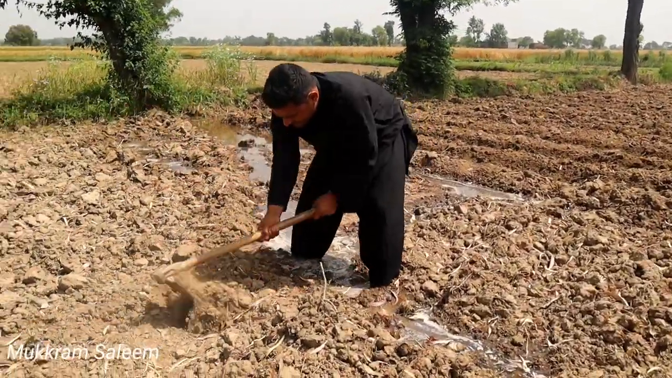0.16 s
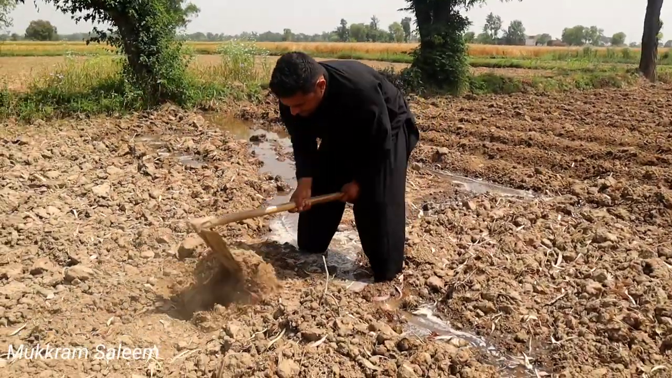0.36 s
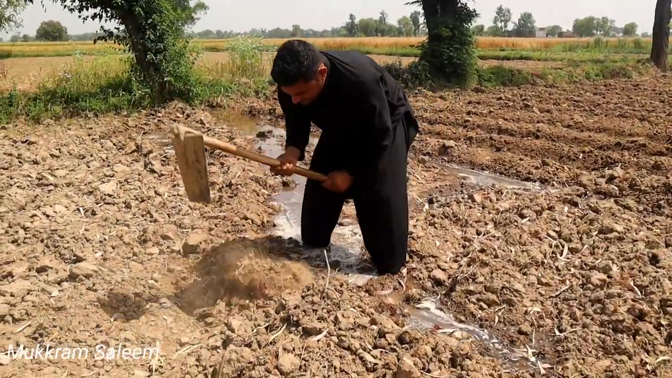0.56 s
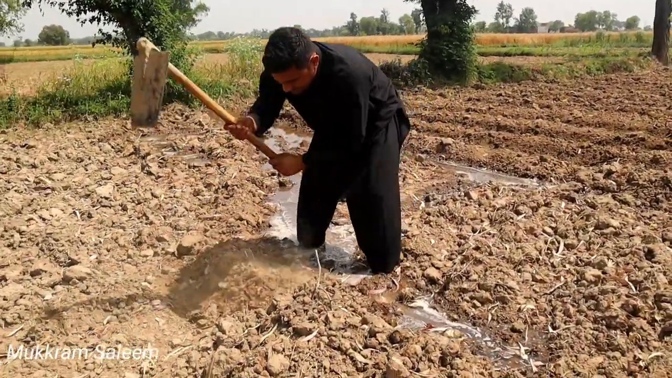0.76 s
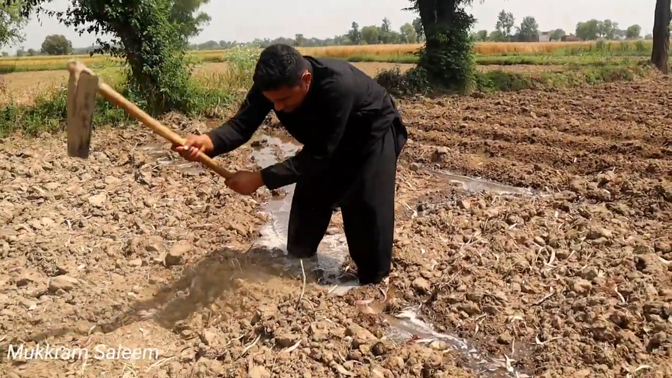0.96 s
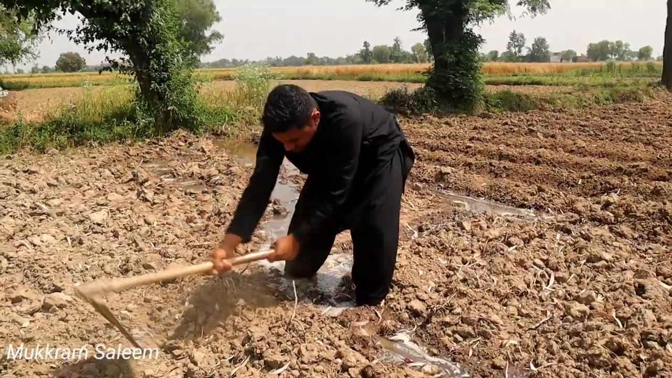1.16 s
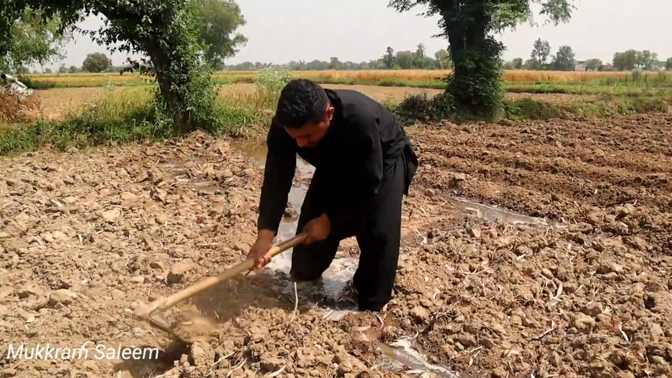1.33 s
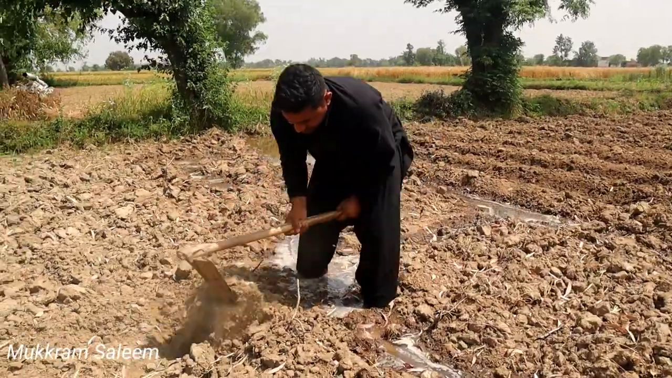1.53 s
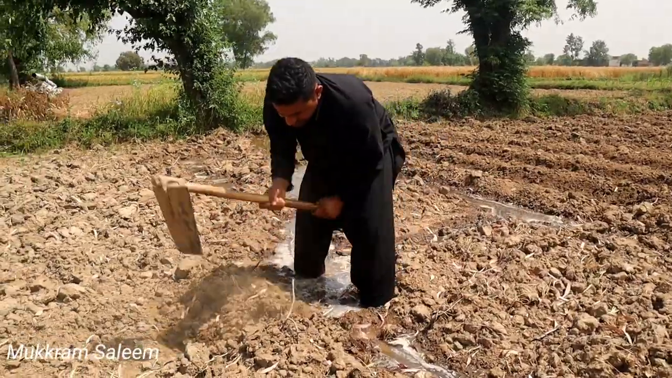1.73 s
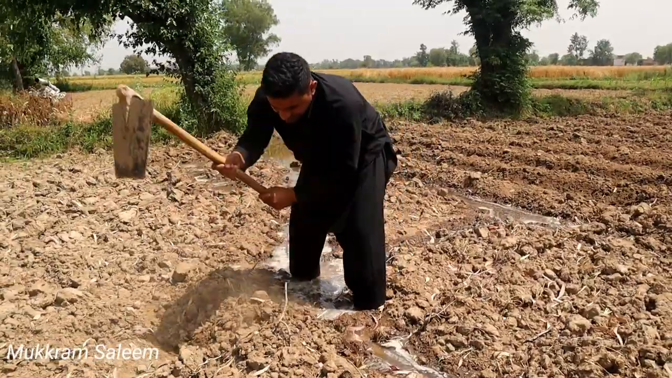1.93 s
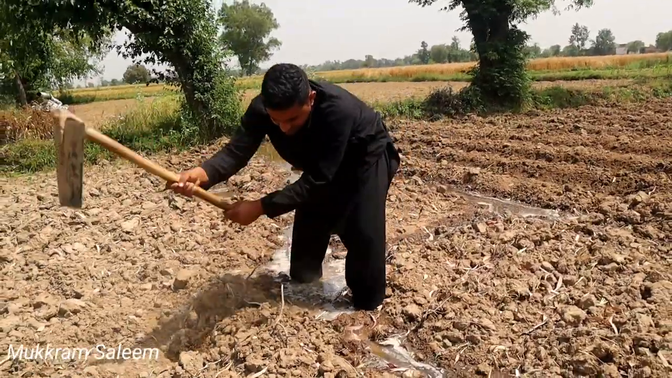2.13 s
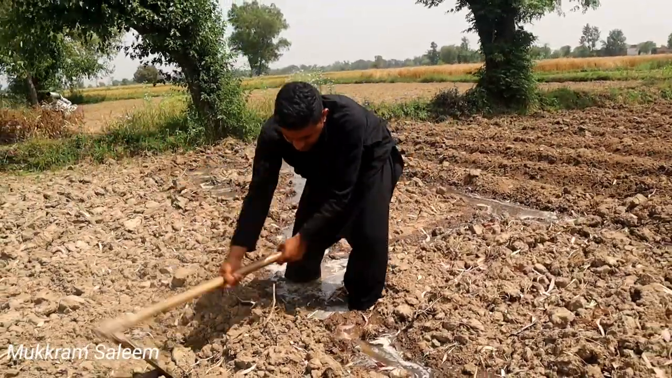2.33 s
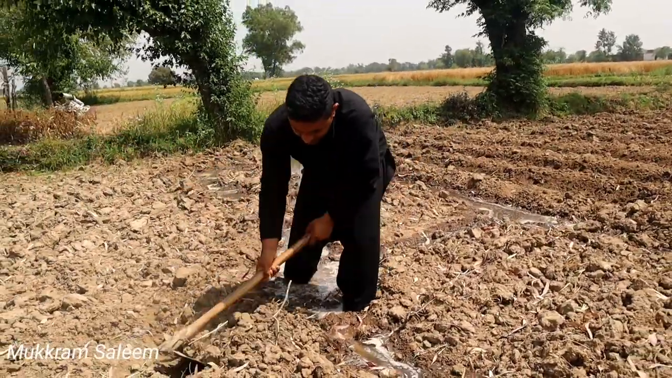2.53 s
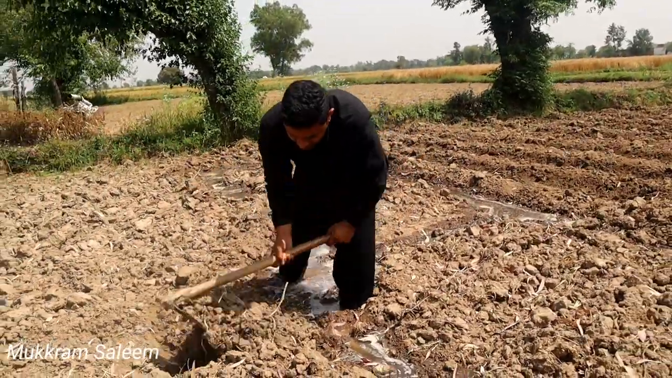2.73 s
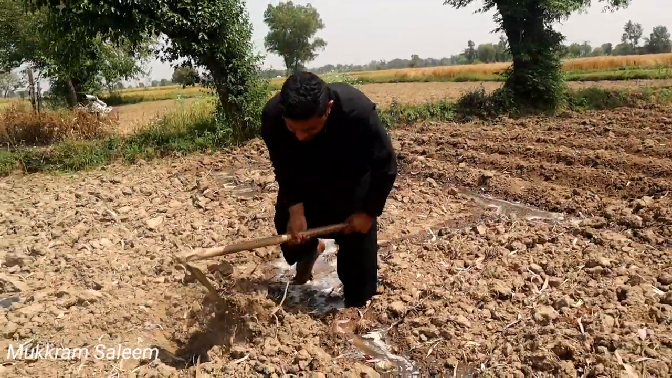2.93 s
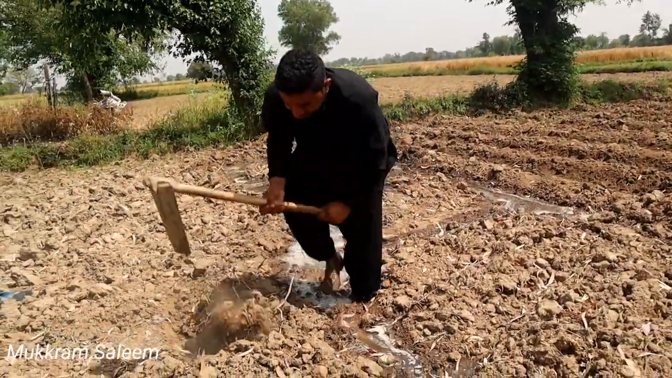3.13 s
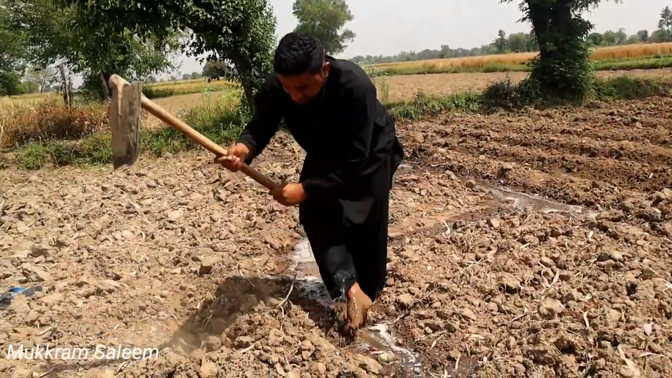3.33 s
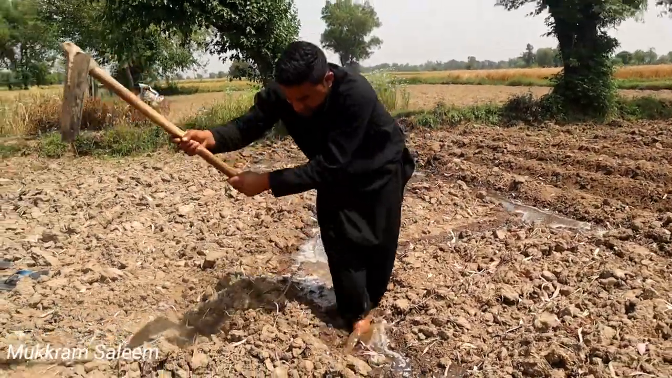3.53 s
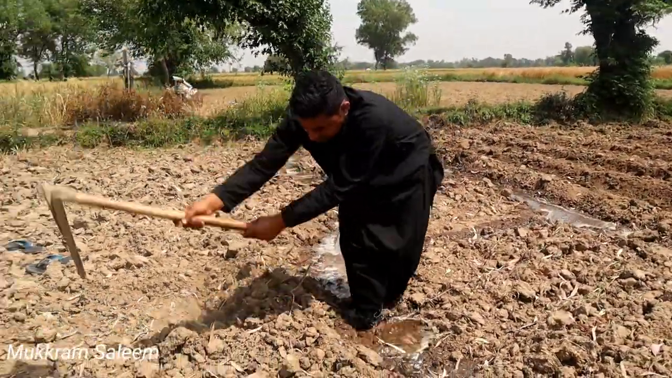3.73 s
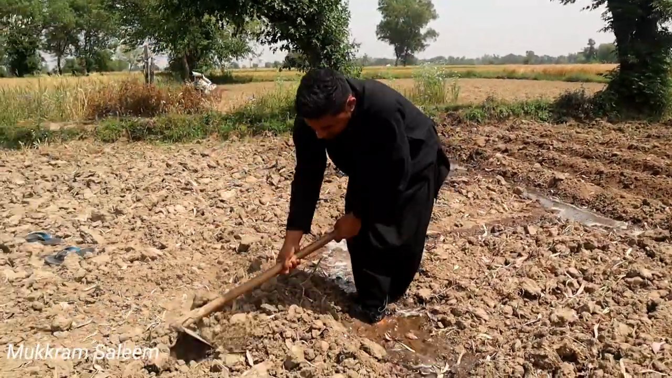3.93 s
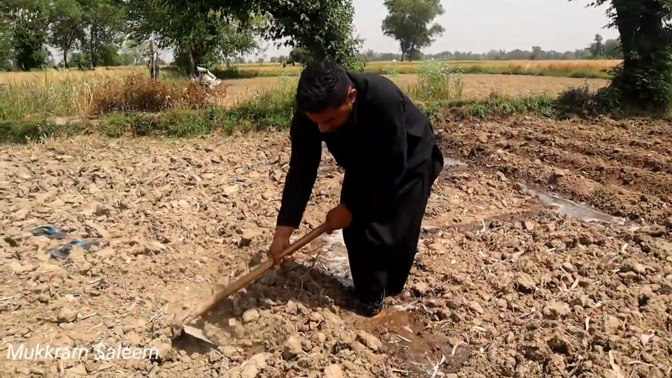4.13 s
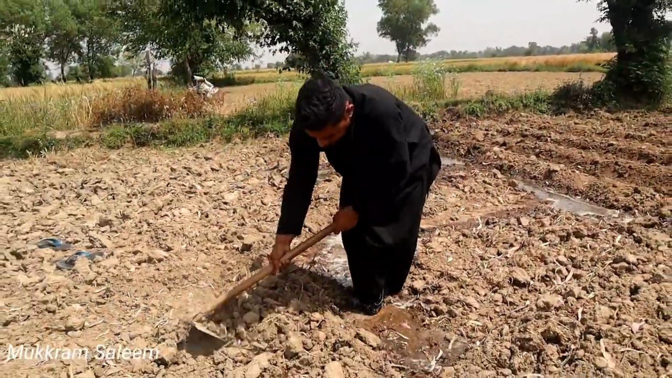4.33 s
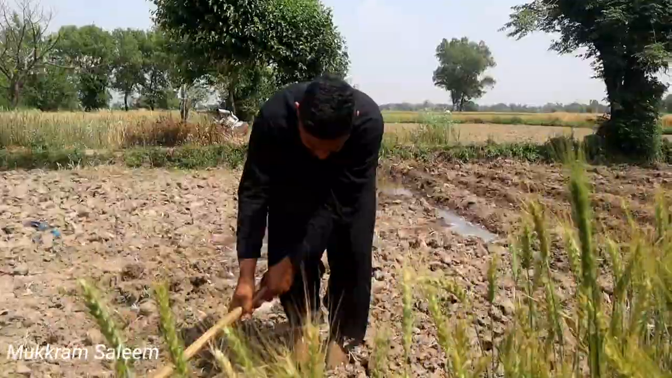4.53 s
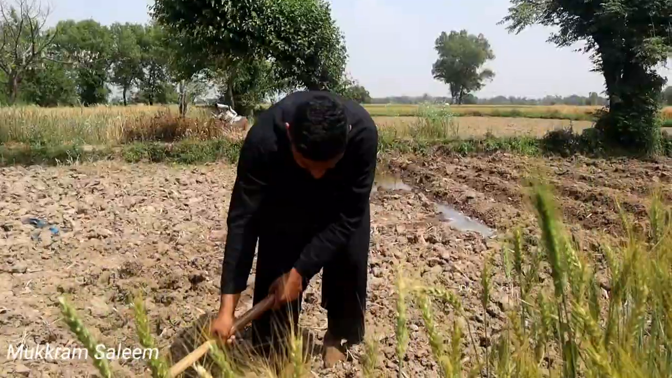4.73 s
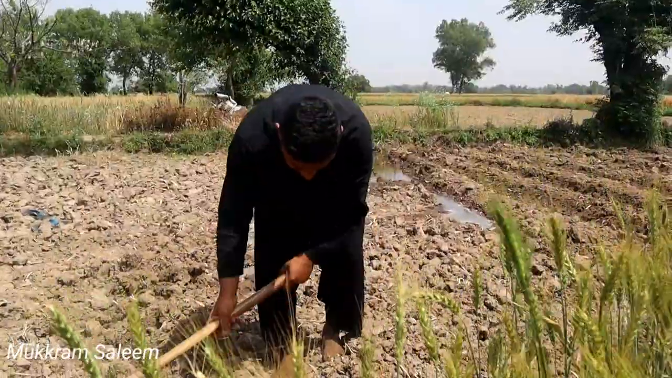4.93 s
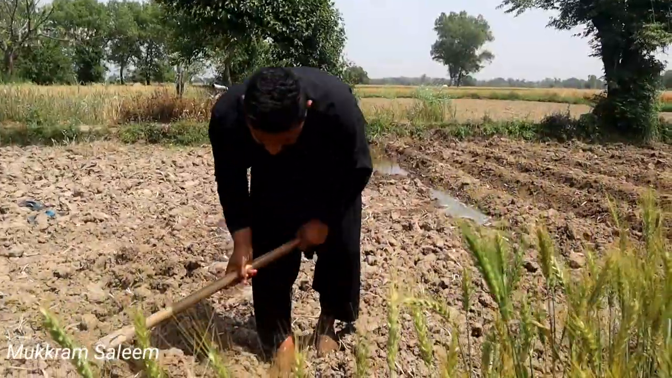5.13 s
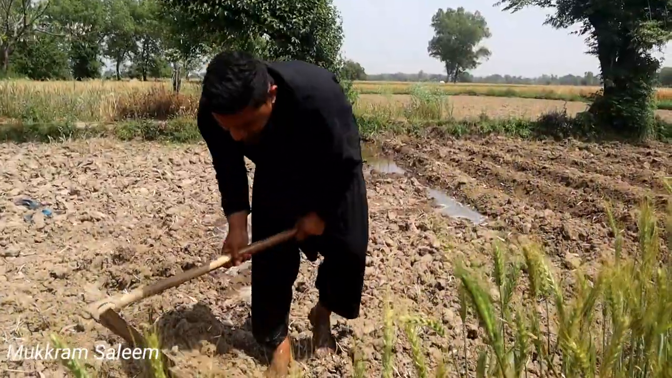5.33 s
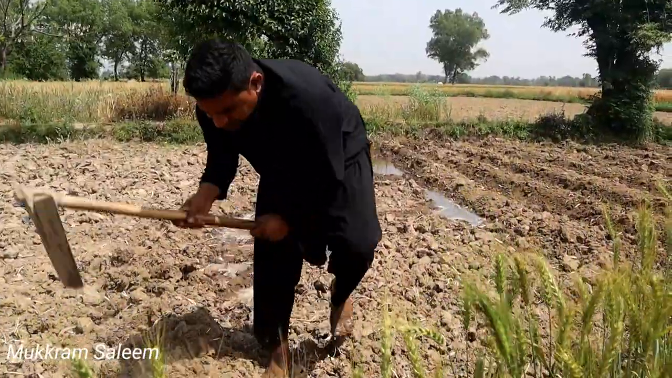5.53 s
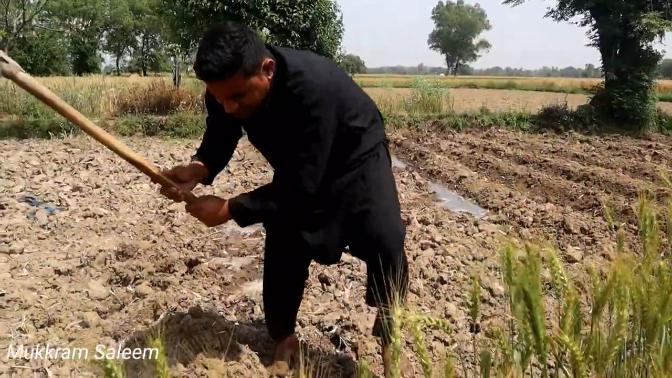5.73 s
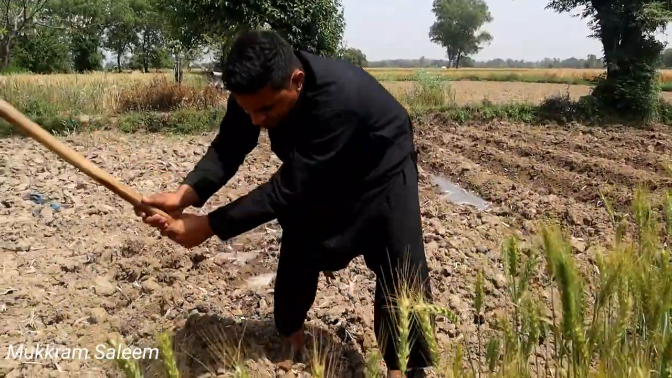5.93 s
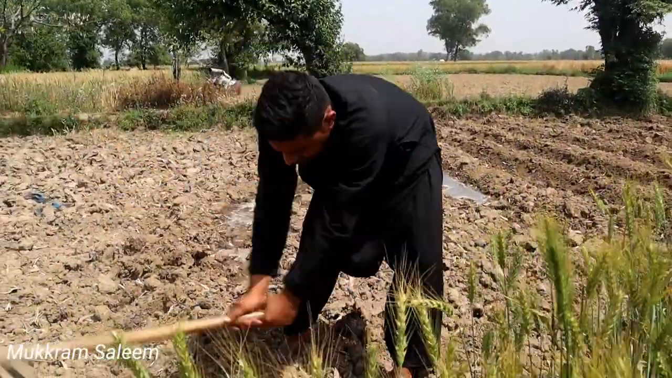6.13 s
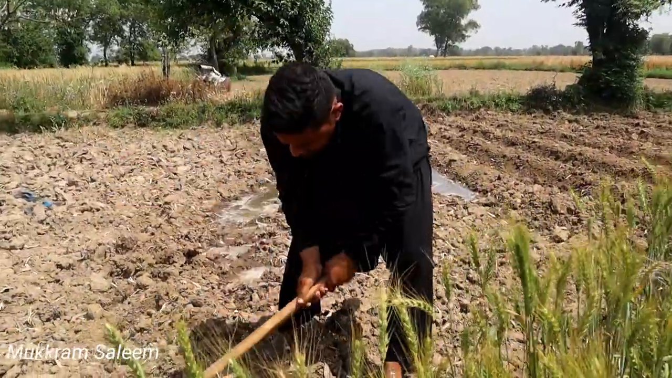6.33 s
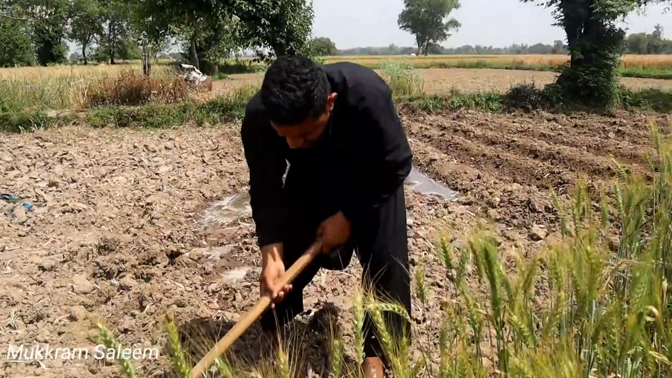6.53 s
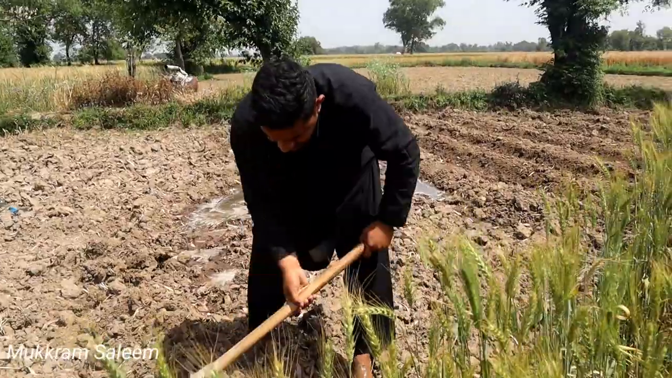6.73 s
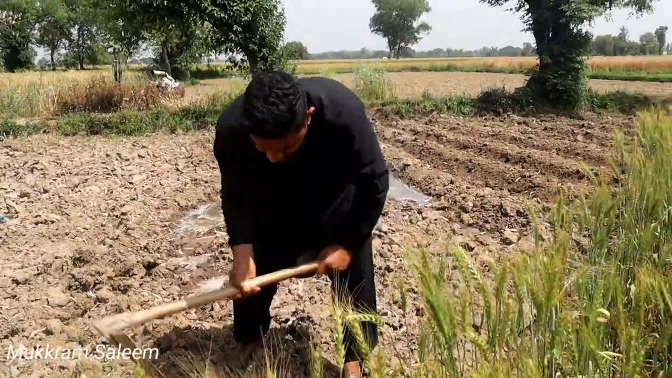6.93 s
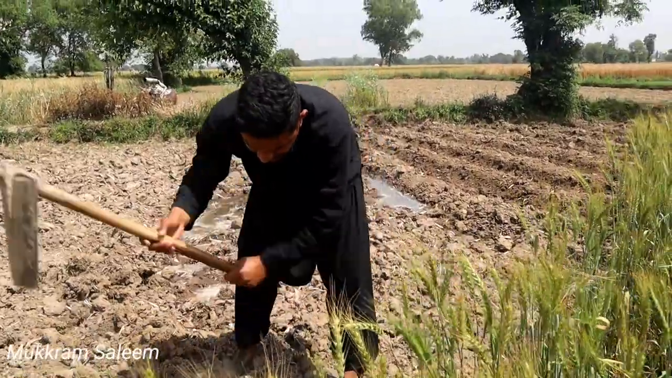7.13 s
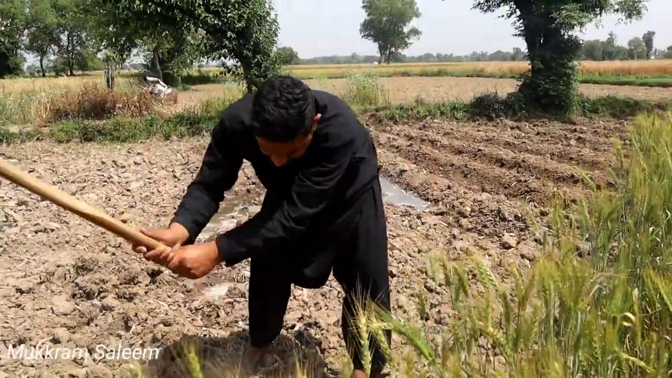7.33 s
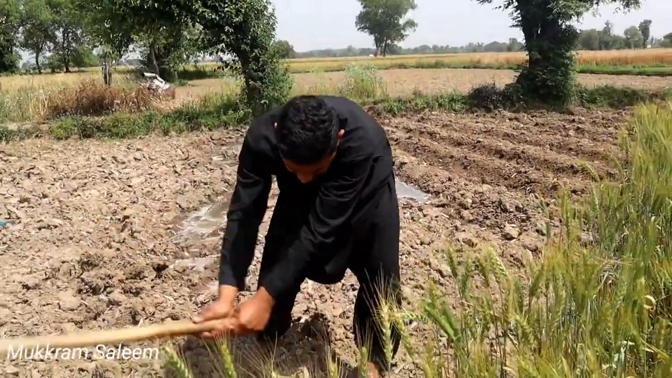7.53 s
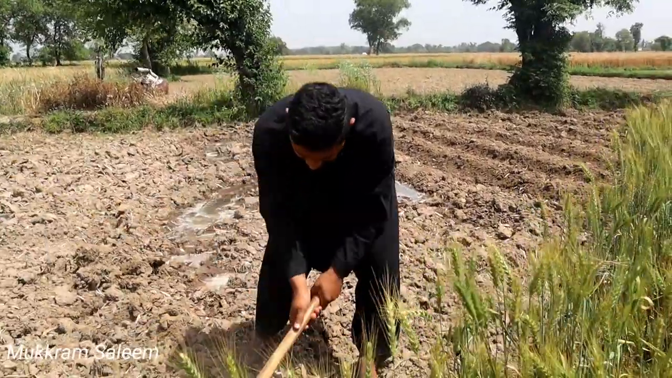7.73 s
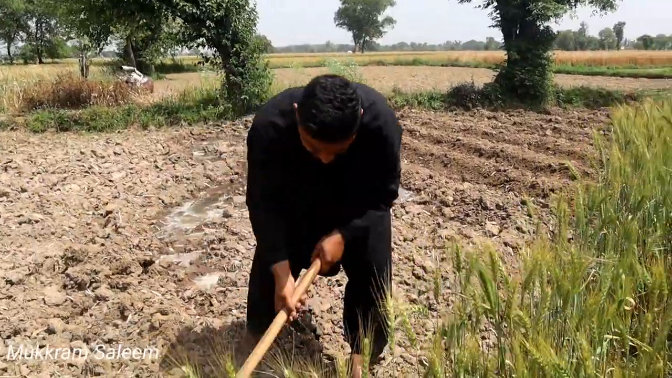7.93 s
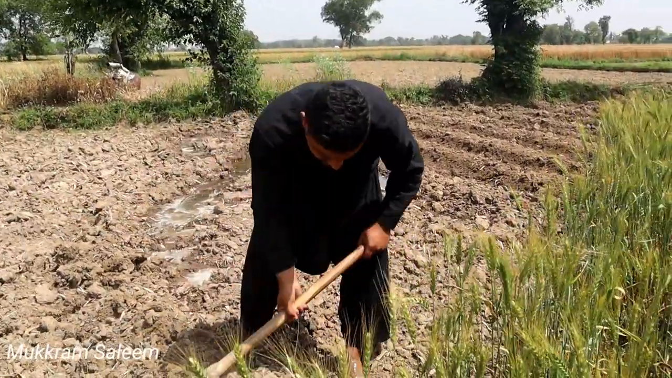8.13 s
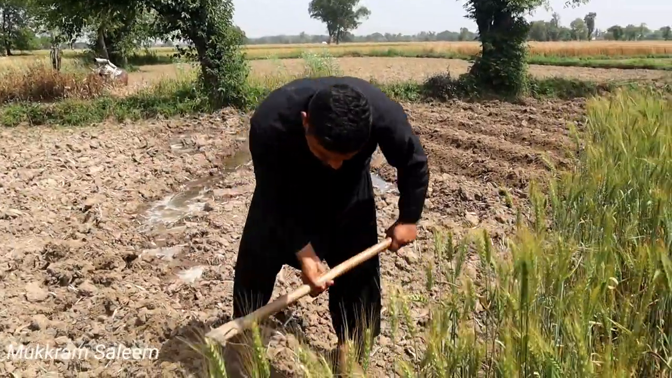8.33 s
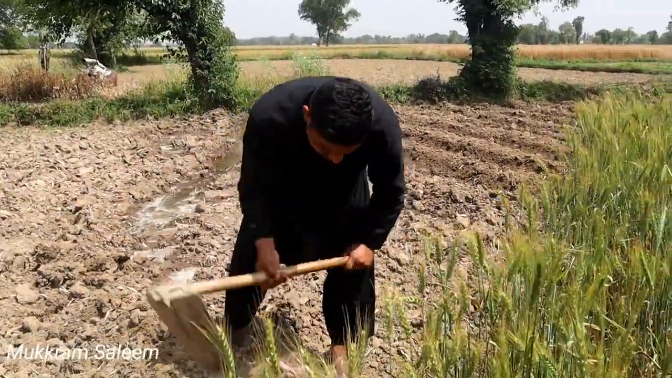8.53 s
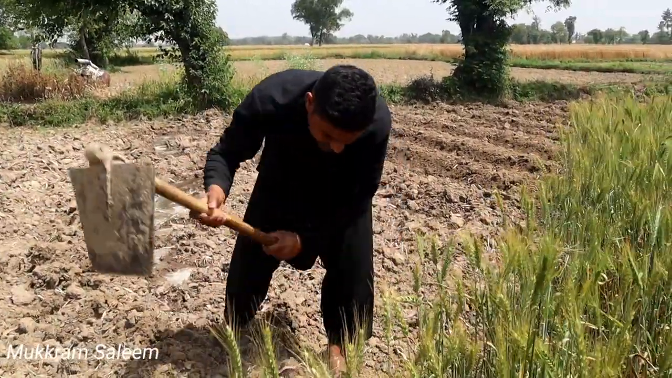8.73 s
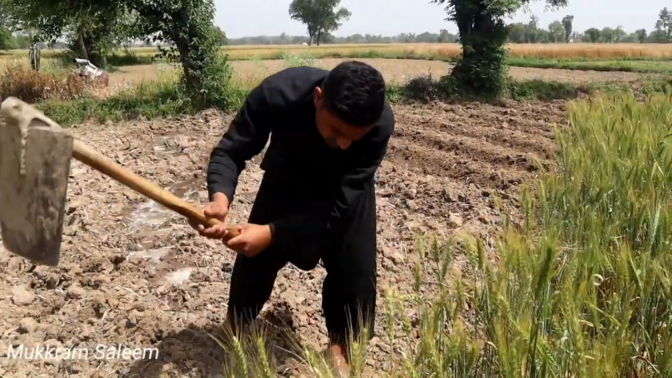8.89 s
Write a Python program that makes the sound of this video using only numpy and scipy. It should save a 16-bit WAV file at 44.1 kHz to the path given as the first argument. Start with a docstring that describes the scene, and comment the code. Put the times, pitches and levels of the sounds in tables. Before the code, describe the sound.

Slow gritty hoe blows crack open dry clods in an open field, with wet foot squelches, low wind buffeting and faint distant birds.

```python
"""A farmer in a wet furrow of an open field chops six times into dry, cloddy soil with a steel hoe.
Gusts rumble on the microphone from the start. Each blow crushes the crust in noisy cracks and rings the blade.
Clods drop as crackling resonances, and crumbs roll under a dry, grainy background hiss that swells and sinks.
Between blows his feet squelch in the mud, as snaps ringing small cavities and bubbles of rising pitch.
From about two seconds in, small birds call far off now and then, as gliding tones with a scattered tail."""
import sys
import numpy as np
from scipy import signal
from scipy.fft import rfft, irfft, next_fast_len
from scipy.io import wavfile

SR = 44100
rng = np.random.default_rng(int(sys.argv[2]) if len(sys.argv) > 2 else 0)


def dump_mix(stems):
    """Bounce the given channels to the path in sys.argv[1] as a 16-bit WAV at rate SR."""
    frames = np.atleast_2d(stems).T  # one column per channel
    limited = np.clip(frames, -1, 1)  # hard clip at full scale
    pcm = np.round(limited * 32767).astype(np.int16)
    wavfile.write(sys.argv[1], SR, pcm)


N = 399546
TIME = np.arange(N) / SR
AGE = np.arange(SR // 3) / SR  # seconds since the start of one event


def undb(db):
    """Decibels to gain."""
    return 10 ** (np.asarray(db) / 20)


def unit(x):
    """Scale to rms 1."""
    return x / np.sqrt(np.mean(x ** 2))


def add(track, s, sound):
    """Mix a sound into the track at time s."""
    start = max(int(s * SR), 0)
    track[start:start + len(sound)] += sound[:N - start]


def colour(x, points):
    """Filter a sound by a curve of (Hz, dB) points, straight over log frequency, and scale to rms 1."""
    hz, db = np.transpose(points)
    size = next_fast_len(len(x))
    f = np.maximum(np.fft.rfftfreq(size, 1 / SR), 1)
    gain = undb(np.interp(np.log(f), np.log(hz), db))
    return unit(irfft(rfft(x, size) * gain, size)[:len(x)])


def ring(x, hz, width_hz):
    """One resonance, gain 1 at its centre."""
    hz = min(hz, SR / 3)
    b, a = signal.iirpeak(hz, hz / min(width_hz, SR / 3), fs=SR)
    return signal.lfilter(b, a, x)


def ring_twice(x, hz, width_hz):
    """The same resonance twice in a row, for steeper sides."""
    return ring(ring(x, hz, width_hz), hz, width_hz)


def grains(size, spread_db):
    """Dense tiny fractures of very unequal strength, redrawn every 16 samples, at rms 1."""
    strength = np.repeat(rng.standard_normal(size // 16 + 1), 16)[:size]
    return unit(rng.standard_normal(size) * undb(spread_db * strength))


def walk(rate, size=N):
    """Smooth chance with a spread near 1, heading for a new value rate times a second."""
    return np.interp(TIME[:size] * rate, np.arange(4096), rng.standard_normal(4096))


def fade(t60, start=0):
    """Level 1 until start, then an exponential decay by 60 dB in t60 seconds."""
    return np.exp(-np.log(1000) * np.maximum(AGE - start, 0) / max(t60, 1e-3))


def wobble(hz, waver):
    """A rough vibration near rms 1 whose pitch strays by the share waver."""
    unsteady_hz = hz * (1 + waver * walk(hz / 2, size=len(AGE)))
    return np.sqrt(2) * np.sin(2 * np.pi * np.cumsum(unsteady_hz) / SR)


def wind():
    """Eddies buffet the microphone; stronger gusts shed smaller, faster ones."""
    # Wind at the microphone. Each row: time in seconds, level in dB before a fixed 0.87 dB lift.
    gusts = [(0.0, -36), (0.07, -28), (0.22, -36), (1.36, -32), (2.07, -41.5), (2.17, -26.5), (2.37, -32.5),
             (2.55, -25.5), (3.18, -44.5), (3.56, -36.5), (4.01, -42.5), (4.06, -36), (4.54, -41.5),
             (4.79, -29), (5.7, -33), (5.75, -25.5), (5.88, -34), (7.11, -44.5), (7.47, -26.5), (7.52, -34),
             (7.62, -28.5), (7.72, -34.5), (7.87, -29), (8.45, -47), (8.86, -40), (9.06, -50.5)]
    # Rumble of the gusts. Each row: frequency in Hz, relative density in dB per Hz.
    rumble_spectrum = [(8.8, -33), (15, 1.5), (32, 0.5), (75, -1), (167, -14.5), (221, -23), (350, -32),
                       (460, -60), (770, -120)]
    eddy_spectrum = [(50, -13), (90, 15), (170, -2), (250, -18), (420, -5.0), (1500, -44)]  # Hz, dB
    when, level_db = np.transpose(gusts)
    gust_db = np.interp(TIME, when, level_db)
    buffet_db = 1.2 * walk(12)
    flutter_db = 2.5 * walk(22)
    rumble = colour(rng.standard_normal(N), rumble_spectrum) * undb(gust_db + buffet_db + 0.87)
    eddies = colour(rng.standard_normal(N), eddy_spectrum)
    # the small eddies swing 1.3 times as far in dB as the gusts
    return rumble + eddies * undb(-49 + 1.3 * (gust_db - gust_db.max()) + flutter_db)


def chirp(length, start_hz, end_hz):
    """A hoarse gliding chirp, smeared by the trees on its way."""
    progress = np.minimum(AGE / length, 1)
    hoarseness_hz = 170 * walk(600, size=len(AGE))
    hz = start_hz + (end_hz - start_hz) * progress + hoarseness_hz
    whistle = np.sin(2 * np.pi * np.cumsum(hz) / SR) * np.sin(np.pi * progress)
    scatter = rng.standard_normal(len(AGE)) * fade(t60=0.055)
    smeared = signal.fftconvolve(whistle, scatter / np.linalg.norm(scatter))[:len(AGE)]
    return 0.5 * whistle + 0.72 * smeared


def birds():
    """Two distant birds, each repeating one gliding note of its own."""
    # One bird's short falling notes. Each row: start in seconds, level in dB.
    falling = [(2.59, -45), (2.92, -41), (3.26, -45.5), (6.85, -41), (7.255, -43), (7.59, -43.5)]
    # The falling note: length in seconds, start in Hz, end in Hz.
    falling_note = (.06, 4000, 3260)
    # Another bird's longer rising notes. Each row: start in seconds, level in dB.
    rising = [(1.925, -49.5), (2.31, -47), (7.325, -41)]
    # The rising note: length in seconds, start in Hz, end in Hz.
    rising_note = (0.17, 2080, 2400)
    out = np.zeros(N)
    for calls, note in (falling, falling_note), (rising, rising_note):
        for s, db in calls:
            add(out, s, undb(db) * chirp(*note))
    return out


def hiss_and_crumb_levels():
    """Levels in dB: each stretch swells, wavers unevenly, then falls or rises at its own rate."""
    # Stretches of fine hiss and low crackle. Each row: start in seconds, length in seconds,
    # hiss in dB, crackle of crumbs in dB (before surges), fall afterwards in dB per second (negative: a rise).
    stretches = [(0.126, 0.2, -42, -47.5, 15), (1.34, 0.46, -45, -47.5, 31), (2.55, 0.56, -46.5, -47, 4.5),
                 (2.88, 0.49, -46.5, -57, 20), (4.05, 0.56, -45.5, -47.5, 59),
                 (4.906, 0.51, -43.5, -50.5, 33), (5.74, 0.17, -44.5, -54, 30),
                 (6.292, 0.69, -40.5, -45, 24), (7.75, 1, -41.5, -48, -3), (8.582, 0.23, -39, -43, 67)]
    rise_s = 0.12  # the hiss swells
    faintest_hiss_db, faintest_crumbs_db = -60, -54  # faintest level of the hiss and the crackle
    hiss, crumbs = undb(faintest_hiss_db) ** 2, undb(faintest_crumbs_db) ** 2
    surge = undb(1.4 * walk(26))
    for s, length, hiss_db, crumbs_db, fall in stretches:
        swell = np.clip((TIME - s) / rise_s, 0, 1)
        course = surge * swell * undb(-fall * np.maximum(TIME - s - length, 0))
        hiss = hiss + (course * undb(hiss_db)) ** 2
        crumbs = crumbs + (course * undb(crumbs_db)) ** 2
    return 10 * np.log10(hiss), 10 * np.log10(crumbs)


def spurts(lowest_hz, octaves, grain_db, flicker_db):
    """Grainy noise in half-octave bands, each surging on its own."""
    out = np.zeros(N)
    for hz in lowest_hz * 2 ** np.arange(0, octaves, 0.5):
        band = ring_twice(grains(N, grain_db), hz, hz / 2)
        out += band * undb(flicker_db * walk(45))
    return out


def hiss_and_crumbs(hiss_db, crumbs_db):
    """A fine dry hiss swells and sinks; crumbs roll and tick in it."""
    # Fine dry hiss. Each row: frequency in Hz, filter gain in dB.
    hiss_spectrum = [(1500, -28), (3500, -7.5), (5500, -6), (7700, 0.5), (10000, -3), (12500, -4.5),
                     (15500, -9)]
    # Rolling crumbs. Each row: frequency in Hz, filter gain in dB.
    crumb_spectrum = [(100, -7.5), (300, 0.5), (600, -1), (1000, -0.5), (1700, 0.5), (2800, -3.5),
                      (4500, -6.5), (9000, -25)]
    ticks_per_s = 45
    fine = spurts(1800, 3.5, grain_db=2.2, flicker_db=1.7)
    coarse = spurts(200, 5.5, grain_db=3.2, flicker_db=2.8)
    ticks = (rng.random(N) < ticks_per_s / SR) * rng.standard_normal(N)
    hiss = colour(fine, hiss_spectrum) * undb(hiss_db)
    ticking = colour(ticks, hiss_spectrum) * undb(hiss_db - 9)
    crumbs = colour(coarse, crumb_spectrum) * undb(crumbs_db + 1.5)
    return hiss + ticking + crumbs


def bubble(hz, t60):
    """A ringing air pocket whose pitch climbs as it nears the surface."""
    rise = 12  # multiples of the starting pitch gained per second
    return np.sin(2 * np.pi * np.cumsum(hz * (1 + rise * AGE)) / SR) * fade(t60)


def bubbles():
    """Air pockets close in the puddle."""
    # Each row: start in seconds, level in dB, starting pitch in Hz, decay by 60 dB in seconds.
    pockets = [(3.421, -18, 1236, 0.014), (3.562, -25, 1410, 0.048), (3.775, -32, 744, .04),
               (3.838, -25, 820, 0.034), (3.861, -25.5, 1350, 0.017)]
    out = np.zeros(N)
    for s, db, hz, t60 in pockets:
        add(out, s, undb(db) * bubble(hz, t60))
    return out


def squelch(hz, t60):
    """Wet films snap and ring a small cavity in the mud, with a little spray and a few tiny bubbles."""
    spray_spectrum = [(200, 0), (700, -2.5), (2400, -2), (4500, -7.5), (8000, -15.5), (15000, -33)]  # Hz, dB
    envelope = fade(t60, 0.0023)
    snaps = grains(len(AGE), spread_db=5) * envelope
    cavity = unit(ring(snaps, hz, 0.17 * hz))
    spray = colour(snaps, spray_spectrum)
    froth = 0
    # four bubbles within the first half of t60, from half an octave below the cavity to 0.7 above
    for when, octaves in rng.uniform((0, -0.5), (0.5, 0.7), (4, 2)):
        start = int(when * t60 * SR)
        froth = froth + envelope[start] ** 0.5 * np.roll(bubble(hz * 2 ** octaves, t60=0.045), start)
    return (undb(-5) * cavity + undb(0.5) * spray) * np.std(envelope) + undb(-5) * froth


def squelches():
    """The loudest sucks of the mud."""
    # Each row: start in seconds, level in dB, cavity in Hz, decay by 60 dB in seconds.
    sucks = [(0.902, -33.5, 1940, 0.02), (1.018, -33, 1190, 0.1), (1.105, -28, 1520, 0.016),
             (2.277, -34, 1570, 0.036), (2.291, -34.5, 2620, 0.053), (3.418, -36, 1350, 0.11),
             (3.540, -22, 1550, 0.018), (3.552, -23.5, 970, 0.014), (3.56, -24.5, 1400, 0.019),
             (3.579, -33, 1430, 0.0118), (3.645, -31, 1880, 0.04), (3.697, -31, 1960, 0.053),
             (3.803, -30.5, 1710, 0.035)]
    out = np.zeros(N)
    for s, db, hz, t60 in sucks:
        add(out, s, undb(db) * squelch(hz, t60))
    return out


def wading():
    """While a foot moves, small squelches follow each other unevenly."""
    # A foot shifts in the mud. Each row: start in seconds, length in seconds, middle level of its squelches in dB.
    steps = [(0.858, .09, -41), (0.998, .14, -39.5), (2.246, .07, -43), (3.511, .055, -39),
             (3.643, .07, -35), (3.732, .09, -40)]
    snaps_per_s, middle_hz, t60_s = 81, 1600, 0.06
    scatter_db, scatter_octaves = 2.5, 0.404
    out = np.zeros(N)
    for s, length, db in steps:
        draws = rng.standard_normal((int(length * snaps_per_s), 3))
        for slot, (when, strength, size) in enumerate(draws):
            snap = squelch(middle_hz * 2 ** (scatter_octaves * size), t60_s)
            add(out, s + (slot + when / 2) / snaps_per_s, undb(db + scatter_db * strength) * snap)
    return out


def clod(hz, t60):
    """A lump lands with a snap and breaks: the smaller it is, the higher its crackle."""
    envelope = fade(t60, 0.0029)
    snap = undb(3) * signal.unit_impulse(len(AGE))
    cracks = grains(len(AGE), spread_db=1.5) * envelope + snap
    return unit(ring(ring(cracks, hz, hz), hz, 2 * hz)) * np.std(envelope)


def strays(crumbs_db):
    """Single lumps tumble at random, louder where the crackle of crumbs is louder."""
    lumps_per_s, middle_hz, t60_s = 12, 990, 0.03
    lump_db = 4.5  # over the given level of the crumbs
    scatter_db, scatter_octaves = 1.5, 0.52
    out = np.zeros(N)
    draws = rng.standard_normal((int(lumps_per_s * N / SR), 3))
    for slot, (when, strength, size) in enumerate(draws):
        s = np.clip((slot + when) / lumps_per_s, 0, TIME[-2])
        db = crumbs_db[int(s * SR)] + lump_db + scatter_db * strength
        add(out, s, undb(db) * clod(middle_hz * 2 ** (scatter_octaves * size), t60_s))
    return out


def clods():
    """The loudest dry clods and pebbles, knocked or dropped."""
    # Each row: start in seconds, level in dB, centre in Hz, decay by 60 dB in seconds.
    lumps = [(0.141, -33.5, 7500, 0.044), (0.423, -31.5, 1750, 0.046), (2.506, -21, 2000, 0.031),
             (2.504, -23.5, 6900, .05), (2.521, -20.5, 595, 0.011), (2.530, -32.5, 670, 0.16),
             (2.787, -30.5, 1110, 0.0063), (2.843, -28.5, 1110, 0.017), (2.873, -34, 1540, 0.15),
             (4.000, -38, 1200, 0.11), (4.019, -31, 580, 0.059), (4.431, -33.5, 790, 0.08),
             (4.451, -31, 1010, 0.026), (4.621, -37, 1000, 0.022), (4.652, -30.5, 6030, 0.17),
             (4.735, -36, 6760, 0.09), (5.077, -33.5, 8500, 0.019), (6.236, -19.5, 6700, 0.17),
             (6.307, -19, 1500, 0.029), (6.309, -24, 7000, 0.017), (6.339, -32, 8000, .012),
             (6.646, -27, 8200, .03), (6.658, -35.5, 2000, 0.26), (7.085, -32, 1170, 0.02),
             (7.215, -35, 1300, 0.017), (7.732, -26, 580, 0.029), (7.995, -28, 4600, 0.0071),
             (8.232, -30, 6330, 0.014), (8.504, -25, 11000, 0.01), (8.629, -31.5, 1450, 0.022)]
    out = np.zeros(N)
    for s, db, hz, t60 in lumps:
        add(out, s, undb(db) * clod(hz, t60))
    return out


def chop(bite, t60, crumble_db, knock_hz, knock_db, thump_hz, thump_db, grit_db):
    """The blade meets the soil, bites deeper and stops; the cracked crust goes on crumbling in lumps."""
    # Hoe head, damped by the soil. Each row: resonance in Hz, width in Hz, relative level in dB.
    blade_modes = [(596, 56, 15), (1010, 300, -3.5), (1363, 35, 11), (1600, 150, 8), (1700, 430, 13.5),
                   (2124, 37, 5), (2560, 70, -2.5), (3900, 69, 1), (5170, 260, -22)]
    # Crushed crust. Each row: frequency in Hz, filter gain in dB.
    crunch_spectrum = [(100, -2.5), (200, -0.5), (350, -4.5), (900, 2), (1700, -3.5), (2600, -11),
                       (4000, -13), (6000, -50), (15000, -43)]
    # Fine grit under the edge. Each row: frequency in Hz, filter gain in dB.
    grit_spectrum = [(1500, -10.5), (3500, -5), (5500, -5), (7700, 0), (9500, -5.5), (12000, -12),
                     (15500, -15)]
    # force starts 8 dB down at contact, after a 0.84 ms onset, and is full at the end of the bite
    force = undb(-8 * np.maximum(1 - AGE / bite, 0)) * np.minimum(AGE / 0.00084, 1)
    lumps_db = 3.5 * walk(200, size=len(AGE))
    crumbling = undb(crumble_db + lumps_db) * fade(0.34, bite)
    breaking = force * np.hypot(fade(t60, bite * 1.17), crumbling)
    cracks = grains(len(AGE), spread_db=4.5)
    crunch = undb(-1.5) * colour(cracks, crunch_spectrum) * breaking
    grit = undb(grit_db) * colour(grains(len(AGE), spread_db=4.0), grit_spectrum) * breaking
    # the same cracks shake the steel, which rings on a little after them
    steel = sum(undb(db) * unit(ring(cracks * breaking, hz, width)) for hz, width, db in blade_modes)
    blade = undb(-1) * unit(steel) * np.std(breaking)
    # the cut knocks hollowly while the blade moves
    knock = undb(knock_db) * wobble(knock_hz, waver=0.12) * force * fade(0.059, bite * 1.7)
    # the packed ground thumps a little later and longer
    rough_ground = unit(ring_twice(cracks, thump_hz * 1.3, 450))
    ground = unit(wobble(thump_hz, waver=0.2) + rough_ground)
    thump = undb(thump_db) * ground * force ** 2 * fade(t60 * 1.94, bite * 1.43)
    return crunch + grit + blade + knock + thump


def hoeing():
    """The six blows of the hoe."""
    # Each row: contact in seconds, bite in seconds, level in dB, decay by 60 dB in seconds, crumbling in dB,
    # knock in Hz, knock in dB, thump in Hz, thump in dB, grit in dB (the last levels relative to the blow).
    blows = [(0.081, 0.0076, -18.5, 0.047, -21, 882, -8, 258, -6, 6.5),
             (1.285, 0.005, -18.5, 0.045, -19.5, 480, 2, 191, -1.5, 5.5),
             (2.461, 0.0073, -13.5, 0.079, -14.5, 453, -8.5, 278, -5.5, 1),
             (3.942, 0.015, -16.5, 0.057, -10.5, 1023, -2, 316, -4.5, 4),
             (6.242, 0.0073, -14.5, 0.14, -15.5, 631, -1, 246, -17.5, 5),
             (7.689, 0.0085, -14.5, 0.081, -16.5, 489, -10.5, 269, -9.5, 3.5)]
    out = np.zeros(N)
    for s, bite, db, *blow in blows:
        add(out, s, undb(db) * chop(bite, *blow))
    return out


def scene():
    """All sources at the one microphone; the open field gives no echo."""
    hiss_db, crumbs_db = hiss_and_crumb_levels()
    background = wind() + birds() + hiss_and_crumbs(hiss_db, crumbs_db)
    lumps = strays(crumbs_db) + clods()
    mud = bubbles() + squelches() + wading()
    out = background + lumps + mud + hoeing()
    return out[None]


def record(dry):
    """The recorder rounds the highest peaks and cuts the top."""
    top_hz = 15750
    rounded = dry / (1 + dry ** 4) ** (1 / 4)
    low_pass = signal.ellip(10, 0.2, 80, top_hz, fs=SR, output="sos")
    return signal.sosfilt(low_pass, rounded)


dry = scene()
out = record(dry)
dump_mix(out)
```